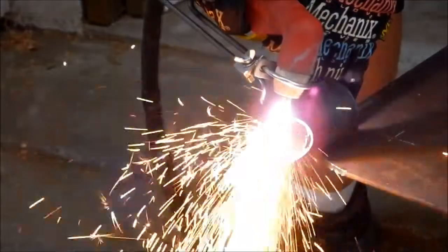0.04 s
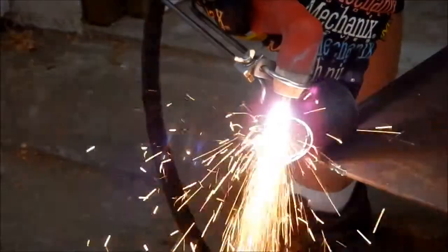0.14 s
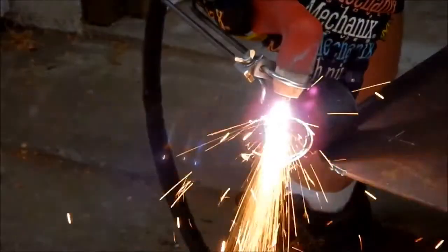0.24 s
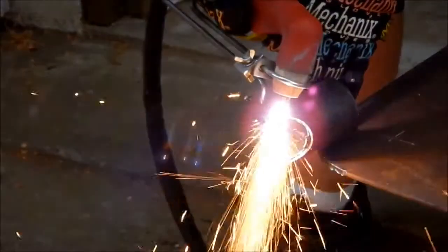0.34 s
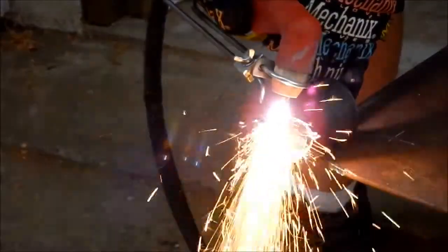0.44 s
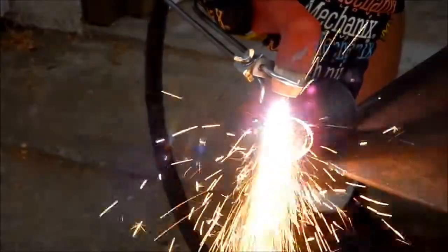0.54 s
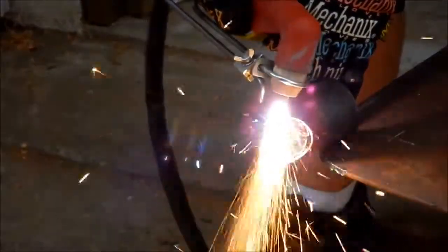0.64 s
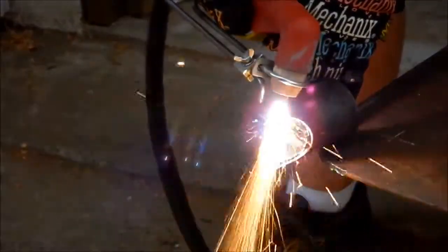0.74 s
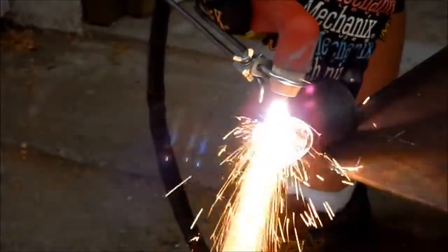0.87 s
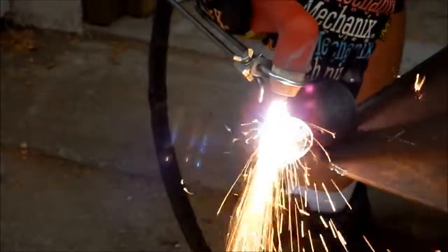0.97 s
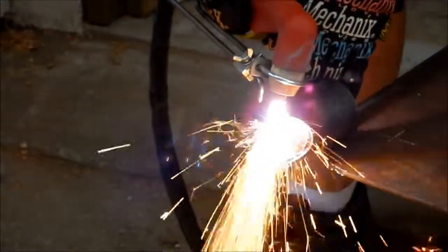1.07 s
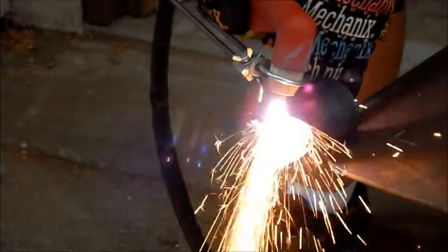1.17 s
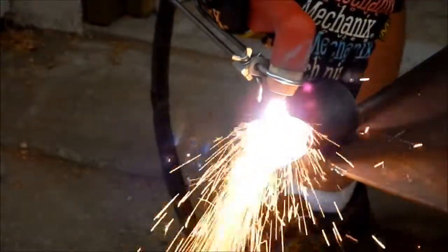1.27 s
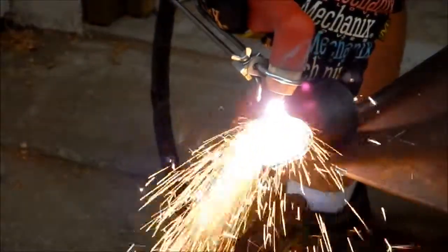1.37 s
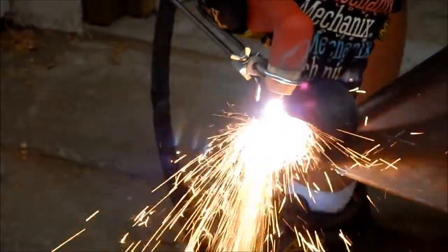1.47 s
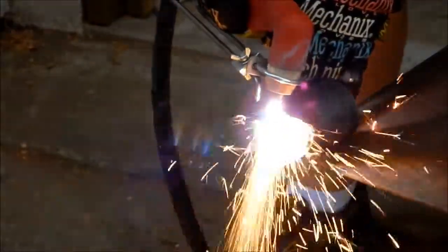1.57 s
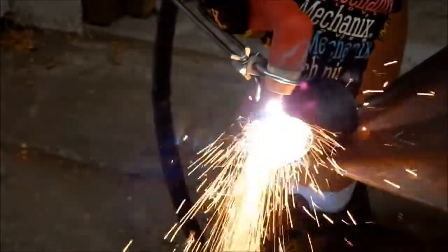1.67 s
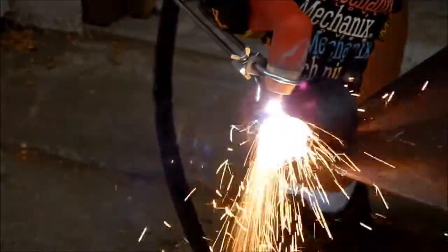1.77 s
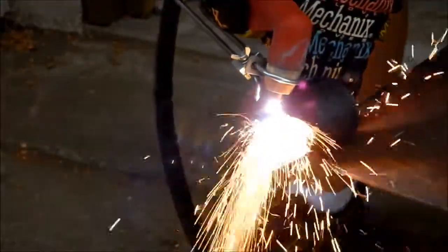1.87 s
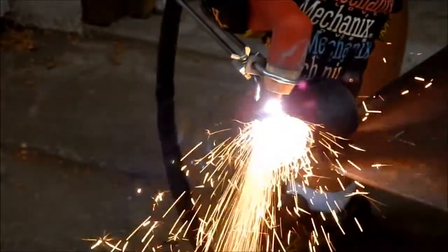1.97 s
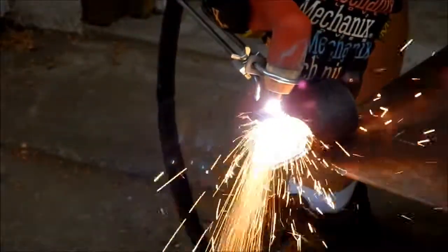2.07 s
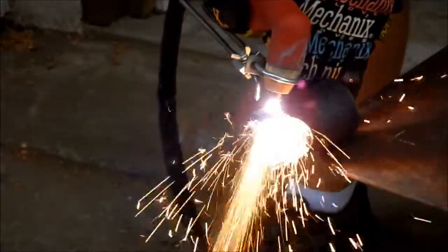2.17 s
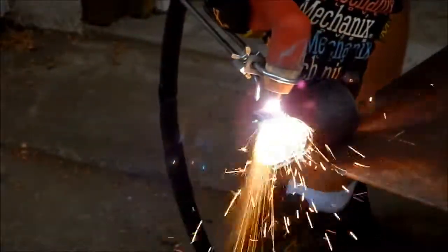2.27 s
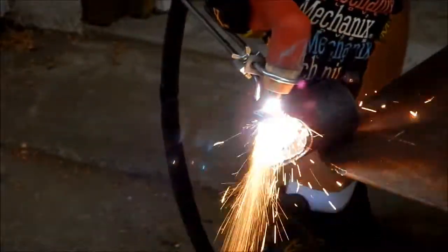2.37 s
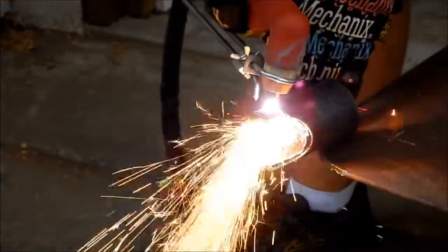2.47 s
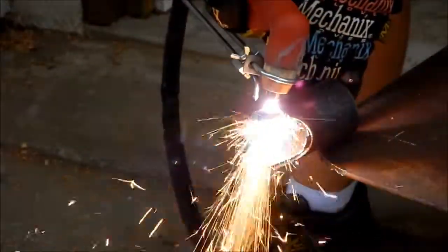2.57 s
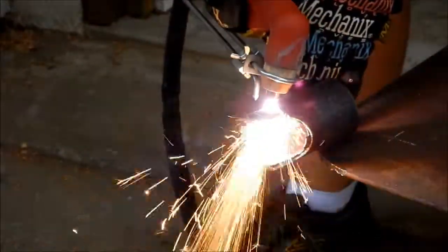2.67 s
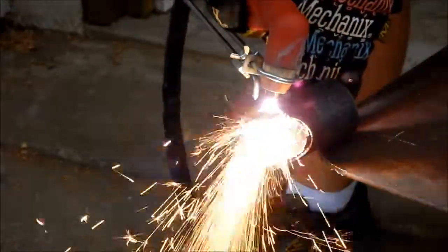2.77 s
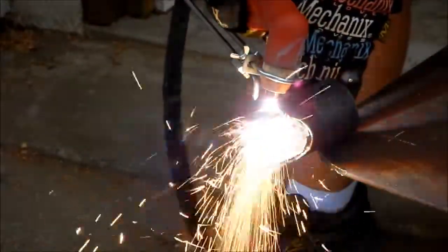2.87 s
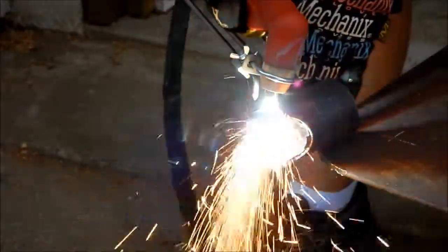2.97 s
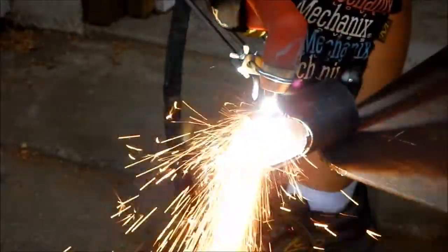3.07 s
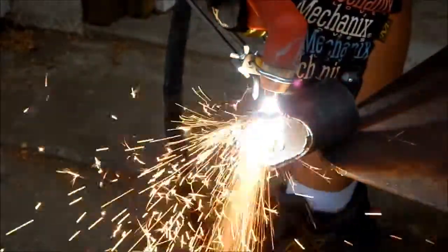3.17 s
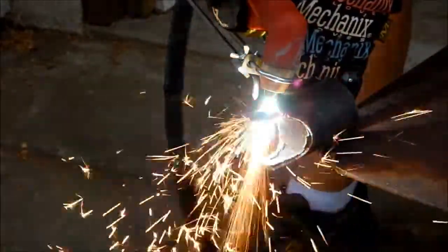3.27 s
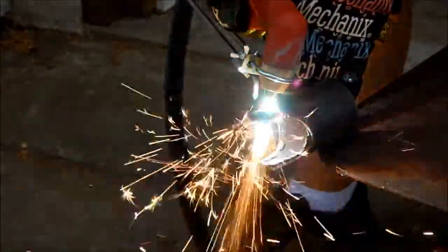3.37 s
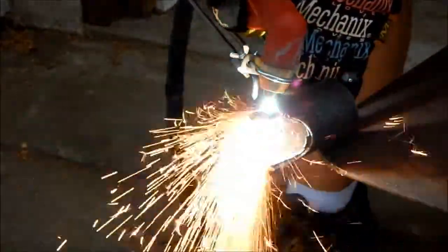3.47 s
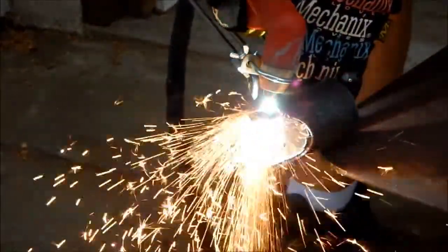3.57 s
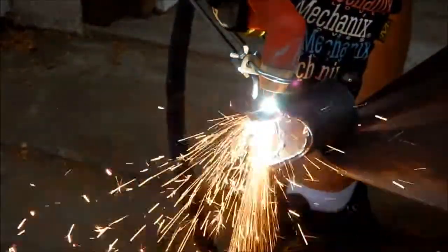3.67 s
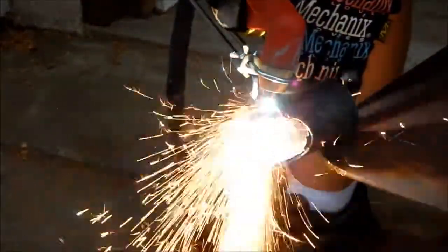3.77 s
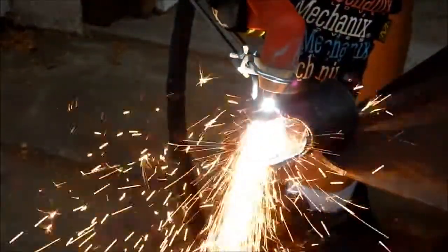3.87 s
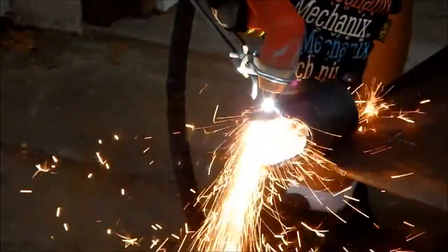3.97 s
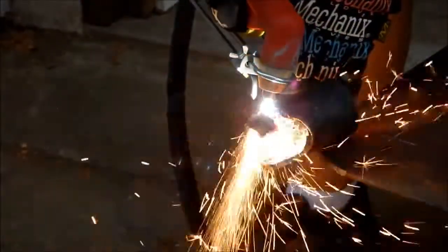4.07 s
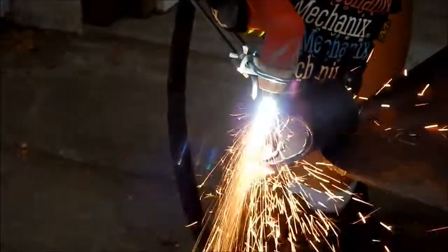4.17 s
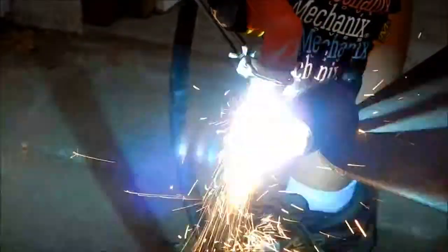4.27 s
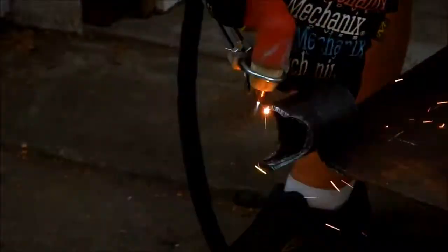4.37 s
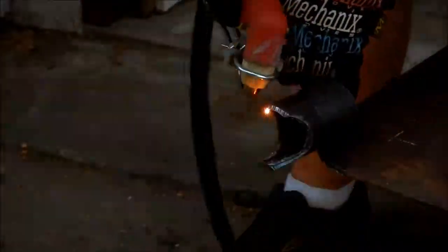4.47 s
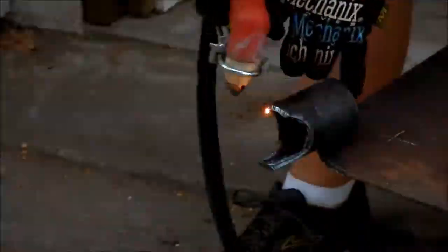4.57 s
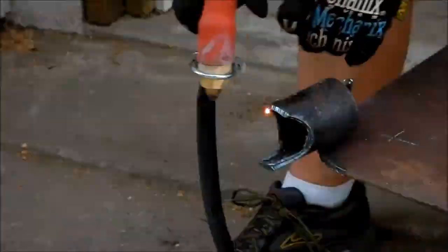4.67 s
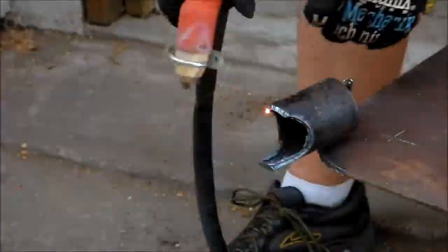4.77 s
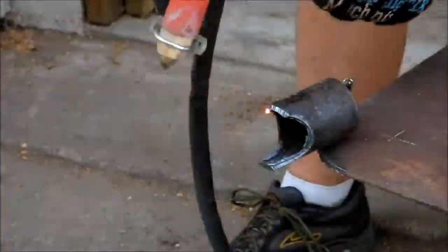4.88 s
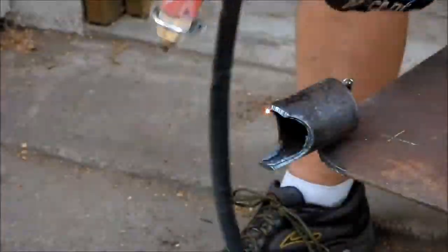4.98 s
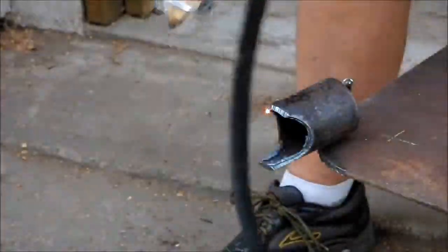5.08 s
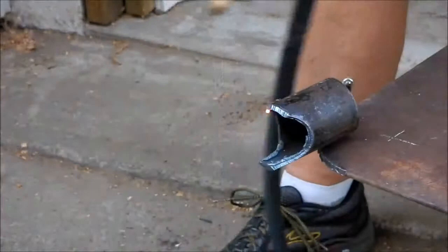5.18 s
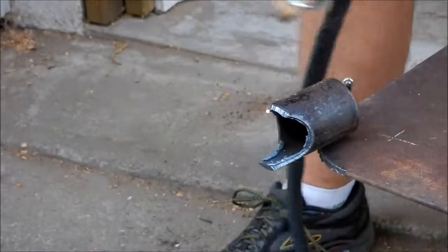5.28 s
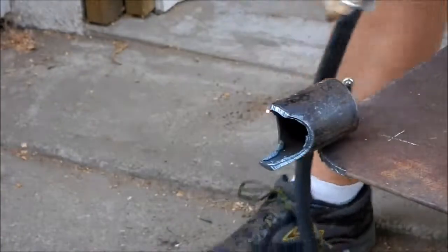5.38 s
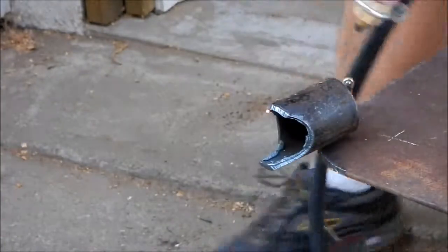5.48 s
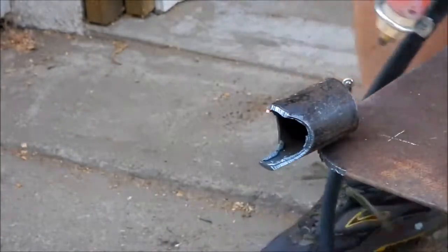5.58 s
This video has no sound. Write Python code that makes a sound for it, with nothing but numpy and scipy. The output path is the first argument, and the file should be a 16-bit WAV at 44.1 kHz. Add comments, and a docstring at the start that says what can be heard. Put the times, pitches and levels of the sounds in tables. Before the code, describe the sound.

Steady bright, crackling jet hiss from a plasma cutter stops abruptly in a rapid burst of sputters, followed by quieter, growing airy blowing.

```python
"""A plasma torch cuts the end off a steel pipe, heard in stereo through two close microphone ports.
From the start its arc jet hisses (shaped noise) and roars in the cut and the pipe (ringing resonances),
with cooling air and low rumble underneath. Near the end the arc flares and dies, then the torch sputters
in bursts of sparks. The cooling air blows on and swells, with one faint late click.
Gusts of stray air on the ports come and go throughout."""
import sys
import numpy as np
from scipy import signal
from scipy.fft import rfft, irfft, next_fast_len
from scipy.io import wavfile
from scipy.ndimage import uniform_filter1d, map_coordinates

SR = 44100
rng = np.random.default_rng(int(sys.argv[2]) if len(sys.argv) > 2 else 0)


def transcribe(u):
    """Save the signal u as a 16-bit wav file named by the first command-line argument.

    u: samples, shape (n,) or (channels, n), limited to [-1, 1]; the rate is SR.
    q: integer samples, one column per channel.
    """
    v = np.clip(np.atleast_2d(u).T, -1, 1)
    q = np.round(v * 32767).astype(np.int16)
    wavfile.write(sys.argv[1], SR, q)


N = 248283

# In spectra and resonances, level_db compares rows of one table; the layer's loudness is set elsewhere.
# Gusts of air on the ports, before random drift: peak_s, peak_level_db, half_length_s
GUSTS = [(0.5, -56, 0.13), (1.1, -54, .05), (2.57, -45.5, 0.1), (2.78, -52, .04), (3.23, -53, 0.034),
         (3.42, -50, .03), (3.54, -48, 0.038), (3.7, -47, 0.071), (4.11, -47, .03), (4.24, -48.5, .04),
         (4.4, -45, 0.025), (4.96, -50.5, 0.066), (5.34, -53, 0.062), (5.47, -48, .04), (5.6, -49, .05)]
# Spectrum of the low rumble: pitch_hz, level_db
RUMBLE_SPECTRUM = [(20, -44), (40, -26), (60, -3), (90, -5), (120, -1.5), (190, -0.5), (240, 0),
                   (300, -4.5), (420, -12), (600, -13), (1000, -90)]
# Cooling air, one row each for nozzle, wash, murmur: start_s, start_level_db, end_s, end_level_db
AIR_LEVELS = [(4.72, -30.5, 5.275, -21), (4.75, -43, 6.1, -32), (4.75, -51, 5, -43)]
# Spectra of the air's nozzle hiss, its wash and its soft murmur: pitch_hz, level_db
NOZZLE_SPECTRUM = [(2440, -60), (4150, -21), (4430, -15), (4820, -13), (5440, -11), (5680, -4.5),
                   (6270, -1.5), (6450, -8.5), (7160, -12.5), (7530, -17), (8220, -10), (11400, -39),
                   (13300, -42), (15500, -53)]
WASH_SPECTRUM = [(2000, -21.5), (2600, -9.5), (3300, -3.5), (3800, 0.5), (4300, -2), (5000, -32),
                 (7000, -90)]
MURMUR_SPECTRUM = [(200, -30), (420, -6), (550, -4), (1200, 1.5), (2300, 1), (2800, -0.5), (4000, -50)]
# Path of the nozzle's breathy tone, before random wander: time_s, pitch_hz
WHISTLE_PATH = [(0.0, 6220), (1.6, 5997), (1.9, 5815), (3.2, 5900), (4.8, 6213), (5.63, 6050)]
# Flares before the arc breaks: start_s, thump_peak_db, crack_over_thump_db, hiss_over_thump_db
FLARES = [(4.102, -27, 18.5, 22), (4.216, -17, -3, 15.5), (4.238, -27, 26.5, 6), (4.391, -20, 16, 16),
          (4.396, -10.5, 2, -8)]
# Sputters after the arc breaks: start_s, thump_peak_db
SPUTTERS = [(4.442, -15.5), (4.457, -18.5), (4.465, -20.5), (4.481, -16), (4.488, -19), (4.497, -21),
            (4.511, -17.5), (4.524, -14.5), (4.534, -15.5)]
# One faint late click: start_s, thump_peak_db, crack_over_thump_db, hiss_over_thump_db
LATE_CLICK = (4.959, -32.5, 13, 8)
# Length of a flare, and of a sputter or click: hold_s, time_to_fall_60_db_s
FLARE_LENGTH = (0.0041, 0.026)
SPUTTER_LENGTH = (.004, .011)
# Spectra of the sparks' low thump and middle crack: pitch_hz, level_db
THUMP_SPECTRUM = [(250, -40), (420, -20), (520, -1), (850, -6.5), (1200, -1), (1650, -5.5), (2200, -12),
                  (3000, -37), (5000, -90)]
CRACK_SPECTRUM = [(1300, -50), (2200, -18), (2700, 2), (3200, -1), (3800, 4.5), (4400, -6), (5600, -38),
                  (9000, -90)]
# The arc breaks: start_s, time_to_fall_60_db_s
ARC_BREAK = (4.401, 0.01)
# Level of the jet hiss, before its random drift: time_s, level_db
HISS_LEVEL = [(0.02, -13.5), (0.08, -14.5), (0.9, -14), (0.93, -15.5), (1.44, -16), (1.71, -14),
              (1.74, -17), (1.97, -13), (1.99, -17.5), (2.11, -13.5), (2.3, -16.5), (2.37, -13),
              (2.58, -16.5), (2.7, -14.5), (2.9, -19), (2.93, -15.5), (3.2, -16.5), (3.55, -13),
              (3.57, -18.5), (3.78, -13.5), (3.94, -16.5), (3.99, -12.5), (4.08, -14), (4.11, -12),
              (4.34, -18.5), (4.39, -13.5)]
# Level of the roar in the cut, before its random drift: time_s, kerf_level_db, wall_level_db
ROAR_LEVELS = [(0.02, -29, -30.5), (0.58, -27.5, -32), (0.8, -24.5, -27), (0.95, -28, -33),
               (1.06, -26, -29.5), (1.18, -26, -29.5), (1.25, -29.5, -34.5), (1.37, -28.5, -29),
               (1.54, -32, -36), (1.6, -29, -32), (1.95, -25.5, -31.5), (2.08, -26.5, -32.5),
               (2.24, -25.5, -30), (2.5, -26, -30), (2.58, -28, -33), (2.79, -25, -30.5),
               (3.45, -23.5, -30), (3.6, -26.5, -30.5), (4.05, -21.5, -27), (4.2, -22, -30),
               (4.33, -26, -37), (4.39, -23.5, -29)]
# Level of the high fizz, before its random drift: time_s, level_db
FIZZ_LEVEL = [(0.02, -30), (0.35, -37), (3.28, -39), (3.63, -37), (3.7, -30), (3.9, -36), (4.12, -31),
              (4.33, -38), (4.39, -36)]
# Swells as the jet blows into the pipe mouth: peak_s, peak_level_db, half_length_s
PIPE_SWELLS = [(0.07, -33.5, 0.058), (0.73, -43, 0.022), (1.6, -40, 0.048), (2.89, -34, .05),
               (3.15, -31, 0.081), (3.28, -34.5, .07), (3.57, -40, .06), (3.9, -32, 0.076)]
# Spectra of the jet hiss (also the sparks' hiss) and the fizz: pitch_hz, level_db
JET_SPECTRUM = [(2060, -34), (3500, -15), (3720, -4), (4000, -11), (4430, -8), (4640, -10), (4890, -7),
                (5280, -4), (5840, -1.5), (6430, -3.5), (7390, -10.5), (8570, -9.5), (8950, -14),
                (9810, -25), (11000, -29.5), (14300, -55), (22000, -120)]
FIZZ_SPECTRUM = [(5290, -27), (9000, -1.5), (9330, -12), (10300, -9.5), (11500, -12.5), (12700, -21),
                 (14800, -21), (15500, -31)]
# Resonances of the small cavities around the torch tip: pitch_hz, width_hz, level_db
TIP_MODES = [(4535, 350, -5.5), (5655, 420, -2), (6380, 300, -2.5), (7980, 380, -8.5), (8200, 140, -9),
             (9500, 230, -15)]
# Resonances of the slot being cut (the kerf): pitch_hz, width_hz, level_db
KERF_MODES = [(2600, 440, -5), (2787, 355, -2.5), (3246, 285, 1.5)]
# Resonances of the jet washing along the pipe wall: pitch_hz, width_hz, level_db
WALL_MODES = [(1490, 106, -17.5), (1707, 275, 1), (2028, 82, 2), (2223, 260, -1)]
# Resonances of the pipe: pitch_hz, width_hz, level_db
PIPE_MODES = [(488, 57, -7.5), (630, 94, -8.5), (877, 104, -7.5), (1060, 150, -1.5), (1217, 130, -2)]
# How much louder the left port is, in the treble only: pitch_hz, left_over_right_db
PORT_LEAN = [(3300, 1.5), (3800, 1.5), (5000, 0.5), (6300, 2), (7300, -1.5), (8500, 3.5), (11000, 1.5),
             (12200, 1)]
# How far the left port runs ahead, in the treble only: pitch_hz, left_lead_radians
PORT_LEAD = [(3600, -0.23), (3880, -0.79), (4200, -0.03), (5800, 0.22), (6400, -0.74), (7200, 0.44),
             (7900, 0.41), (8500, -0.18), (10000, 0.57), (11500, 0.11)]
# Gain of the echo that differs between the ports: pitch_hz, level_db
PORT_SPREAD = [(2800, -93), (3400, -29), (4200, -13.5), (6400, -18), (9800, -5.5), (12000, -7), (15000, -5)]
# Narrow fixed gaps in the final response: pitch_hz, width_hz, depth_db
RESPONSE_GAPS = [(2498, 60, -20), (3995, 170, -15), (5001, 40, -22), (6002, 35, -18), (6998, 35, -18),
                 (8000, 40, -20), (9001, 40, -18), (10002, 60, -15), (11003, 50, -13)]

BREEZE_DB, DRONE_DB = -55.5, -67  # air always stirring on the ports, before drift; workshop drone
WHISTLE_DB, WHISTLE_WANDER_HZ = -7.5, 90  # level against the hiss; random wander of its pitch
RUSH_S, RUSH_DB, RUSH_HALF_S = 4.42, -39, 0.15  # crest, peak level and half length of a broad rush of air
SPUTTER_CRACK_DB, SPUTTER_HISS_DB = 1.5, -0.5  # against the thump
RESTLESS_DB = 0.87  # kerf, wall, pipe and fizz each also drift by themselves
PIPE_DB = -11.5  # pipe against pipe wall, before the swells
ROAR_FLOOR_HZ = 280  # torch and pipe end radiate little below this
TOP_HZ = 15644  # nothing passes from here up


def amp(db):
    """Turn decibels into gain."""
    return 10 ** (np.asarray(db) / 20)


def unit(x):
    """Scale a sound to an rms (average strength) of 1."""
    return x / np.sqrt(np.mean(x ** 2) + 1e-20)


def along(points, hz):
    """Read a (pitch, value) curve at any pitch, on a log pitch axis."""
    pitch, value = np.transpose(points)
    return np.interp(np.log(hz + 1), np.log(pitch + 1), value)


def curves(rows):
    """Draw each column after the time as a curve with one value per sample."""
    seconds, *columns = np.transpose(rows)
    return [np.interp(np.arange(N) / SR, seconds, column) for column in columns]


def wobble(rate):
    """Make a smooth random curve through `rate` random points a second."""
    knots = rng.standard_normal(int(N * rate / SR) + 4)
    return map_coordinates(knots, [np.arange(N) * rate / SR])


def humps(events):
    """Gain of smooth swells (peak s, peak dB, half length s), summed in power."""
    t = np.arange(N) / SR
    power = sum(amp(db) ** 2 * np.exp(-2 * ((t - s) / half) ** 2) for s, db, half in events)
    return np.sqrt(power)


def filtered(x, response):
    """Change strength and phase at each frequency by a given response."""
    m = next_fast_len(N + SR // 2)
    hz = np.fft.rfftfreq(m, 1 / SR)
    return irfft(rfft(x, m) * response(hz), m)[..., :N]


def shape(points):
    """Response that follows a (pitch, dB) spectrum."""
    return lambda hz: amp(along(points, hz))


def modes(rows):
    """Response of several resonances, added with alternating sign."""
    def response(hz):
        total = 0
        for k, (center, width, db) in enumerate(rows):
            damping = 1j * hz * width
            total = total + (-1) ** k * amp(db) * damping / (center ** 2 - hz ** 2 + damping)
        return total
    return response


def turbulence(response, patchy_db, grains=0):
    """Rushing gas: noise with patches of random gain, plus grains, through a response; rms 1."""
    z = signal.stft(rng.standard_normal(N + 512), nperseg=512)[2]
    field = uniform_filter1d(rng.standard_normal(z.shape), size=5, axis=0)  # smooth over pitch
    field = uniform_filter1d(field, size=8, axis=1)  # then over time
    noise = signal.istft(z * amp(patchy_db * unit(field)), nperseg=512)[1][:N]
    return unit(filtered(unit(noise) + grains, response))


def echo(x, t60):
    """Scatter x off many surfaces, energy kept; the torch moves, so paths change every third of a second."""
    hop = SR // 3
    t = np.arange(SR // 5) / SR
    out = np.zeros(N + 4 * hop)
    padded = np.pad(x, (hop, 2 * hop))
    fade = np.sin(np.pi * np.arange(2 * hop) / (2 * hop))
    for start in range(0, N + hop, hop):
        tail = rng.standard_normal(len(t)) * amp(-60 * t / t60)
        tail = tail / np.linalg.norm(tail)
        piece = signal.fftconvolve(padded[start:start + 2 * hop] * fade, tail)
        out[start:start + len(piece)] += piece
    return out[hop:hop + N]


def draught():
    """Low rumble, mostly different left and right: gusts on the ports over the workshop's steady drone."""
    gusts = np.hypot(amp(BREEZE_DB), humps(GUSTS))

    def rumble():
        lumpy = gusts * amp(0.73 * wobble(8.3)) * turbulence(shape(RUMBLE_SPECTRUM), patchy_db=3.0)
        return lumpy + amp(DRONE_DB) * turbulence(shape(RUMBLE_SPECTRUM), patchy_db=-2.0)

    mid = rumble()  # the same in both ports
    side = filtered(rumble(), lambda hz: amp(-1.5) / (1 + (hz / 480) ** 4))  # opposite in the two ports
    return np.array([mid + side, mid - side]) * amp([[-0.6], [0.6]])  # right slightly louder, in dB


def whistle(width_hz):
    """Breathy nozzle tone: narrow noise around a drifting pitch."""
    hz = curves(WHISTLE_PATH)[0] + WHISTLE_WANDER_HZ * wobble(5)
    sway = wobble(width_hz) + 1j * wobble(width_hz)  # random strength and phase widen the tone
    tone = np.real(sway * np.exp(2j * np.pi * np.cumsum(hz) / SR))
    return amp(WHISTLE_DB) * unit(tone)


def cooling_air():
    """Air blows through the nozzle: a narrow hiss, a wash and a soft broad murmur; all three swell late."""
    t = np.arange(N) / SR
    nozzle_db, wash_db, murmur_db = (np.interp(t, row[::2], row[1::2]) for row in AIR_LEVELS)
    rush = humps([(RUSH_S, RUSH_DB, RUSH_HALF_S)])  # lingers after the arc
    hiss = turbulence(shape(NOZZLE_SPECTRUM), patchy_db=0.5) + whistle(width_hz=200)
    nozzle = amp(nozzle_db + 0.85 * wobble(25) + 0.79 * wobble(81)) * hiss
    wash_gain = np.hypot(amp(wash_db + 0.51 * wobble(9)), rush)
    wash = wash_gain * turbulence(shape(WASH_SPECTRUM), patchy_db=-1.5)
    murmur = np.hypot(amp(murmur_db), rush) * turbulence(shape(MURMUR_SPECTRUM), patchy_db=1.2)
    return nozzle + wash + murmur


def bursts(events, hold, tail_t60):
    """Envelopes (thump, crack, hiss) of short puffs: quick start, brief hold, quick decay."""
    t = np.arange(N) / SR
    out = np.zeros((3, N))
    for start, db, crack_db, hiss_db in events:
        rise = np.clip((t - start) / 0.00045, 0, 1)
        puff = rise * amp(db - 60 * np.maximum(t - start - hold, 0) / tail_t60)
        out += puff * amp([[0], [crack_db], [hiss_db]])
    return out


def sputter():
    """The arc flares as it loses the edge; after it breaks, packets of sharp discharges follow."""
    phase = np.cumsum(1500 * amp(2.5 * wobble(300))) / SR  # the gap recharges and fires at an uneven rate
    fired = np.diff(np.floor(phase), prepend=0)
    fired = fired * amp(2.0 * rng.standard_normal(N)) * rng.choice([-1, 1], N)
    sparks = unit(fired) + 0.93 * rng.standard_normal(N)
    late = [(start, db, SPUTTER_CRACK_DB, SPUTTER_HISS_DB) for start, db in SPUTTERS] + [LATE_CLICK]
    puffs = bursts(FLARES, *FLARE_LENGTH) + bursts(late, *SPUTTER_LENGTH)
    envelopes = amp(-9.0) * puffs  # peak to rms
    out = np.zeros(N)
    # every spark feeds all three registers at once
    for envelope, points in zip(envelopes, (THUMP_SPECTRUM, CRACK_SPECTRUM, JET_SPECTRUM)):
        gain = 1 / np.std(filtered(sparks, shape(points)))
        out += gain * filtered(envelope * sparks, shape(points))
    return out


def spatter(rate, spread_db):
    """Droplets of molten steel bursting: dense tiny clicks of unequal size, `rate` a second on average."""
    size = amp(spread_db * rng.standard_normal(N)) * rng.choice([-1, 1], N)
    return unit(size * (rng.random(N) < rate / SR))


def arc():
    """The jet hisses and rings the cut and pipe; the arc root wanders, so all layers flutter together."""
    (jet_db,), (kerf_db, wall_db) = curves(HISS_LEVEL), curves(ROAR_LEVELS)
    t = np.arange(N) / SR
    break_s, break_t60 = ARC_BREAK
    burning = amp(-60 * np.maximum(t - break_s, 0) / break_t60)
    flutter = amp(0.75 * wobble(30) + 0.18 * wobble(120))
    drops = spatter(rate=900, spread_db=3.0)

    def drift(db):
        return amp(db + RESTLESS_DB * wobble(12))

    def slot(hz):
        return modes(KERF_MODES)(hz) / (1 + (hz / 3380) ** 16)  # fades steeply above its top mode

    jet = turbulence(shape(JET_SPECTRUM), patchy_db=0.77, grains=0.27 * drops)
    tip = amp(-7.5) * turbulence(modes(TIP_MODES), patchy_db=2.0)
    kerf = drift(kerf_db) * turbulence(slot, patchy_db=2.4, grains=0.37 * drops)
    wall = drift(wall_db) * turbulence(modes(WALL_MODES), patchy_db=0.9, grains=0.32 * drops)
    blown = np.hypot(drift(wall_db + PIPE_DB), humps(PIPE_SWELLS))
    pipe = blown * turbulence(modes(PIPE_MODES), patchy_db=0.5, grains=0.16 * drops)
    fizz_gain = drift(curves(FIZZ_LEVEL)[0])
    fizz = fizz_gain * turbulence(shape(FIZZ_SPECTRUM), patchy_db=-0.5, grains=0.3 * drops)
    hiss = amp(jet_db + 0.55 * wobble(9)) * (jet + tip + whistle(width_hz=250))
    torch = burning * flutter * (hiss + fizz + kerf + wall + pipe)
    return filtered(torch, lambda hz: 1 - 1 / (1 + (hz / ROAR_FLOOR_HZ) ** 3))


def ports(x):
    """Floor and bench answer; the two close ports differ only in the treble."""
    sign = np.array([[1], [-1]])  # left, right
    near = x + amp(-9.5) * echo(x, t60=0.098)

    def port_response(hz):
        treble = sign / (1 + (3300 / (hz + 1)) ** 24)
        gain = amp(treble * along(PORT_LEAN, hz) / 2)  # half the difference to each side
        return gain * np.exp(0.5j * treble * along(PORT_LEAD, hz))

    direct = filtered(near, port_response)
    return direct + sign * filtered(echo(x, t60=0.15), shape(PORT_SPREAD))


def scene():
    """Torch sounds arrive through the ports, and the draught acts on them."""
    return ports(arc() + sputter() + cooling_air()) + draught()


def record(dry):
    """Cut narrow gaps in the response, clip softly at full scale, then limit the band."""
    def gaps(hz):
        return amp(sum(db / (1 + (2 * (hz - c) / width) ** 2) for c, width, db in RESPONSE_GAPS))

    x = filtered(dry, gaps)
    x = x / (1 + np.abs(x) ** 8) ** (1 / 8)
    return filtered(x, lambda hz: hz < TOP_HZ)


dry = scene()
out = record(dry)
transcribe(out)
```